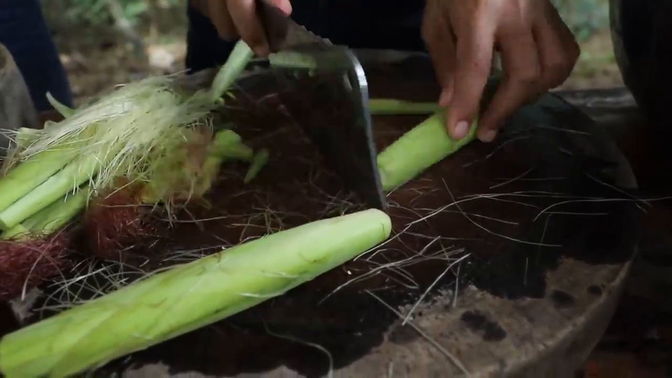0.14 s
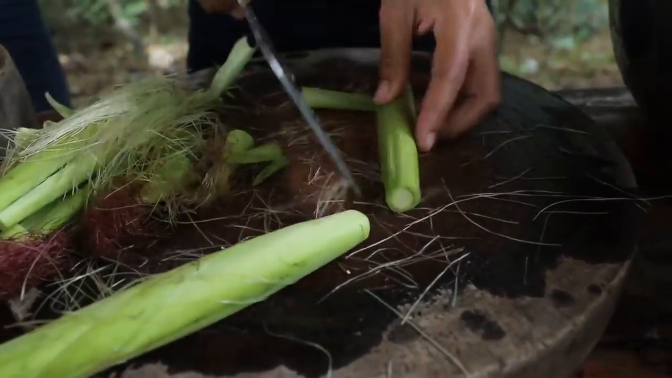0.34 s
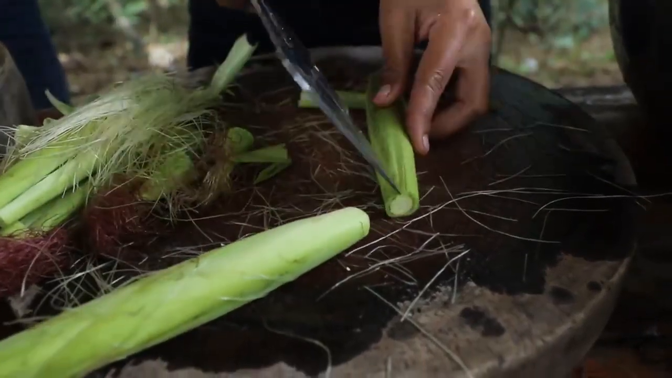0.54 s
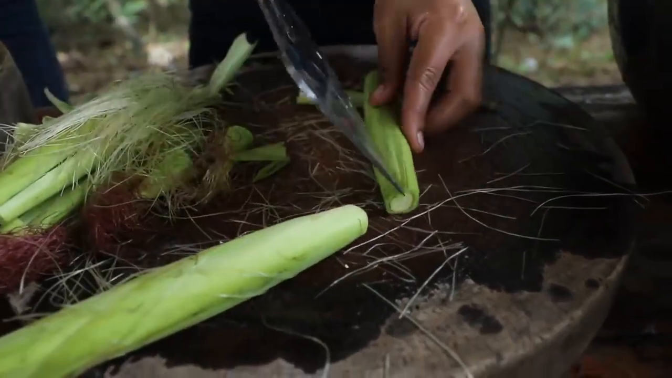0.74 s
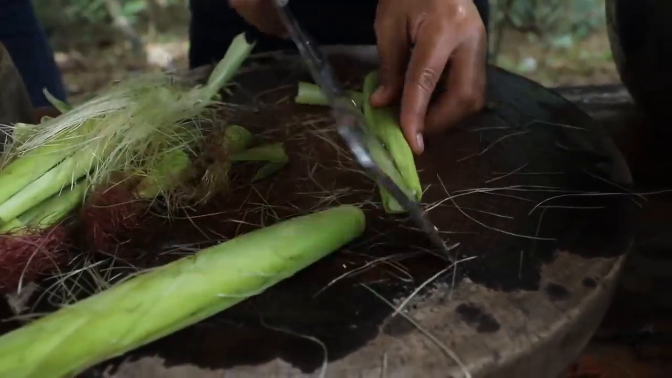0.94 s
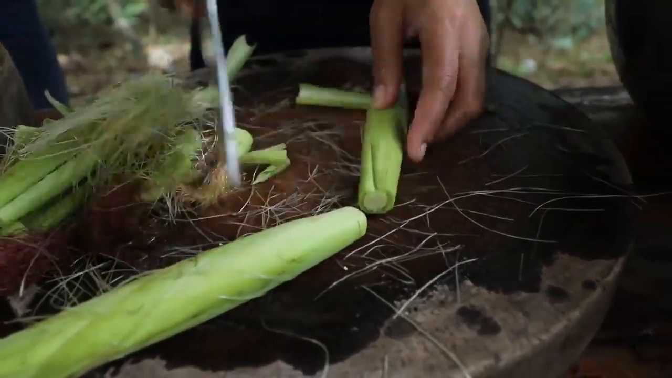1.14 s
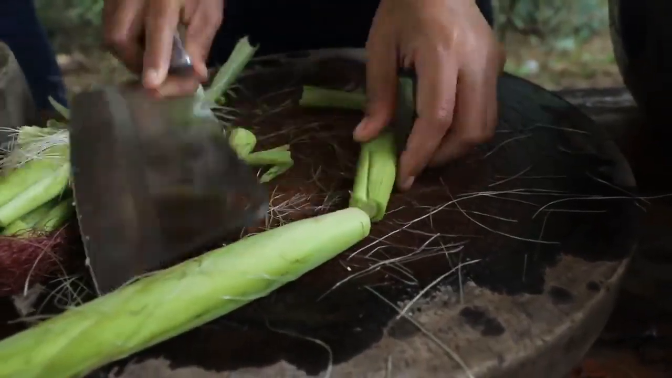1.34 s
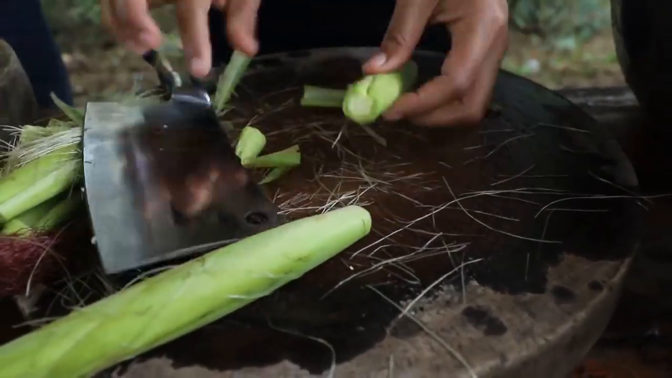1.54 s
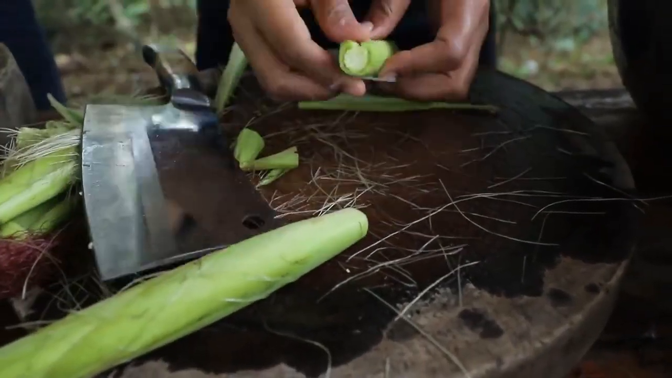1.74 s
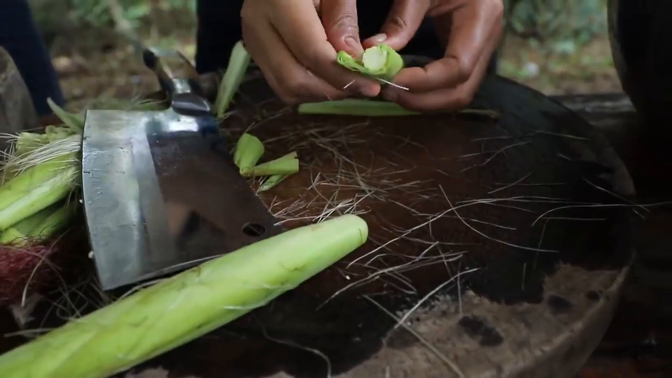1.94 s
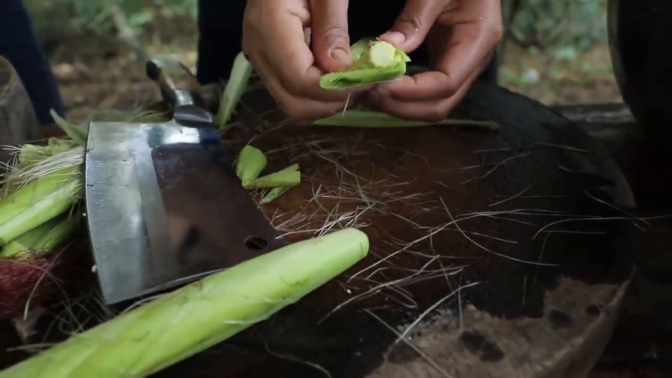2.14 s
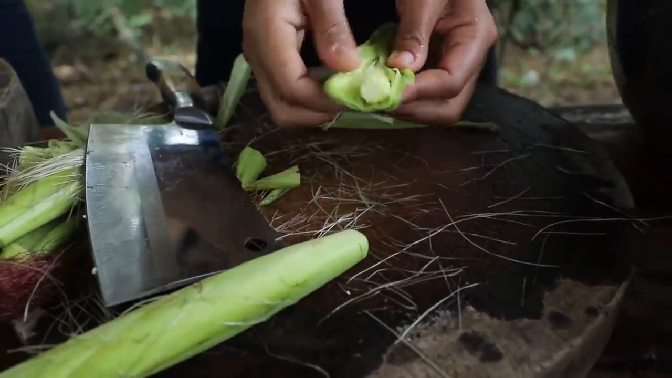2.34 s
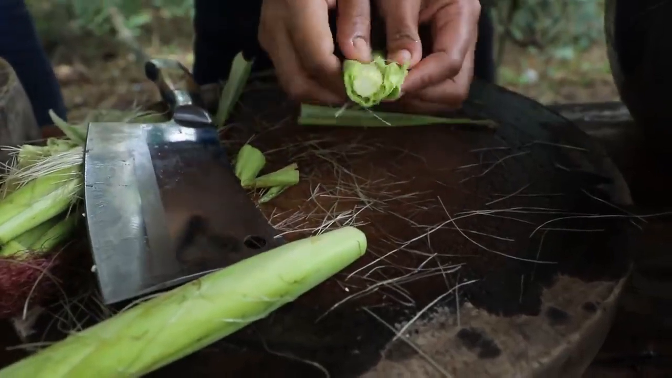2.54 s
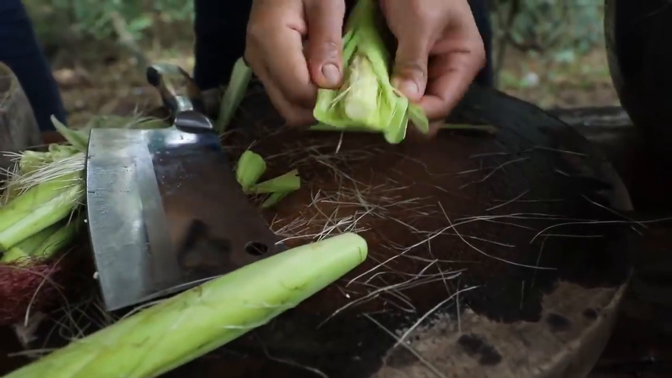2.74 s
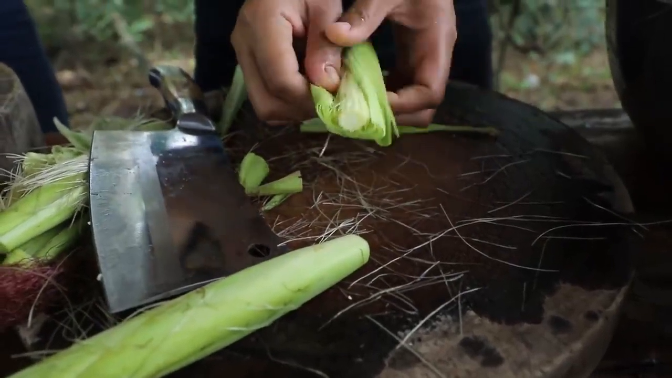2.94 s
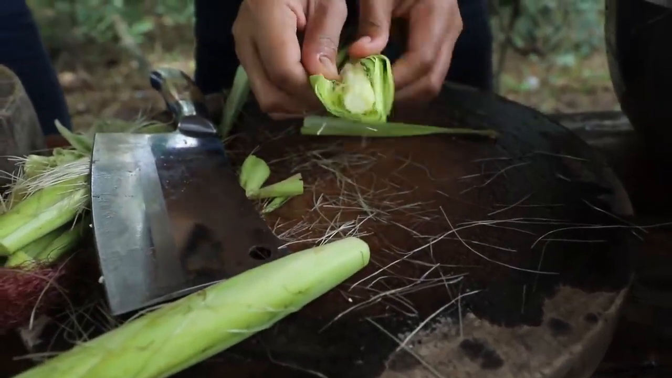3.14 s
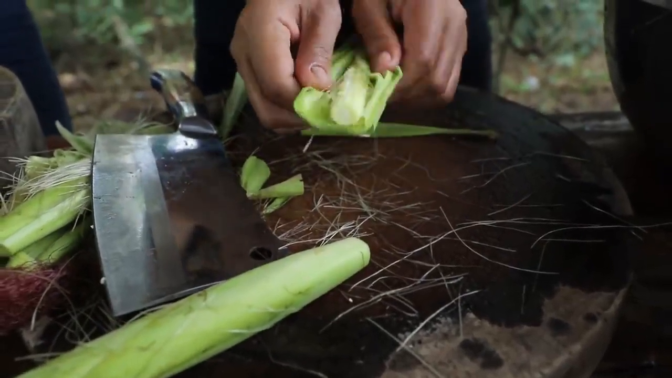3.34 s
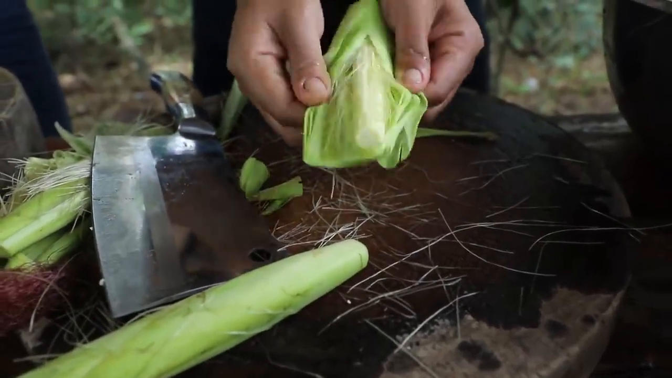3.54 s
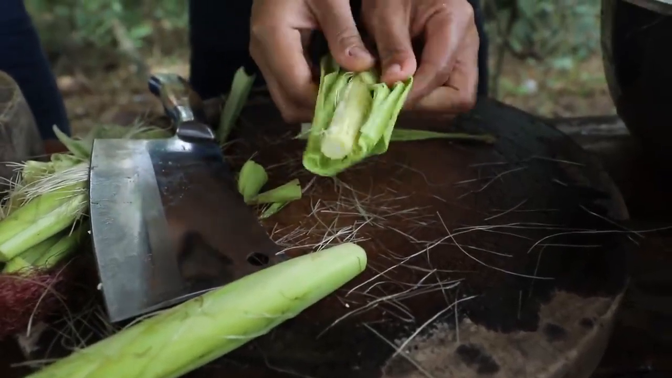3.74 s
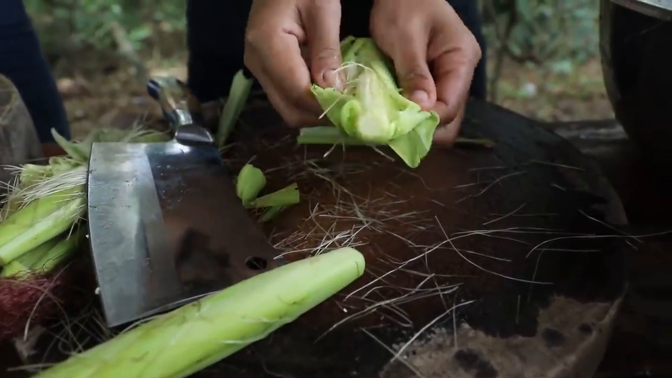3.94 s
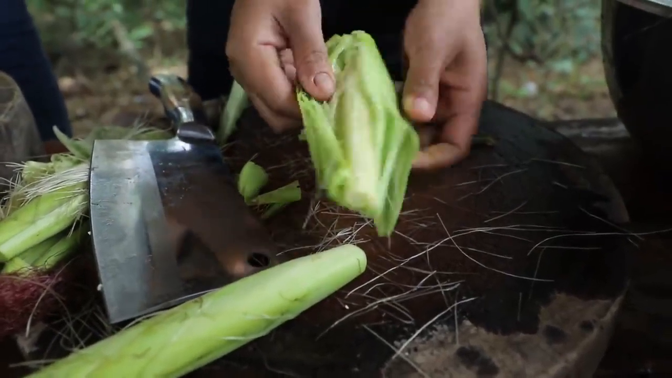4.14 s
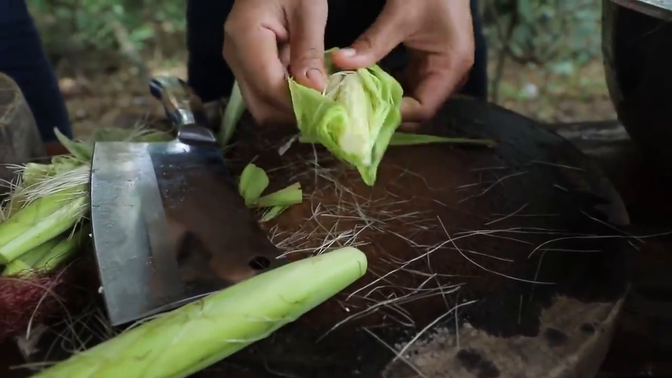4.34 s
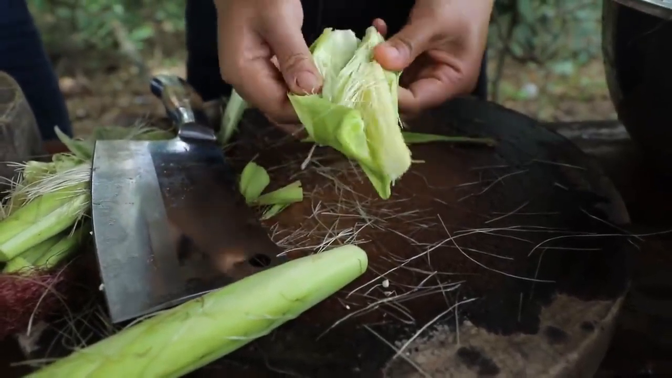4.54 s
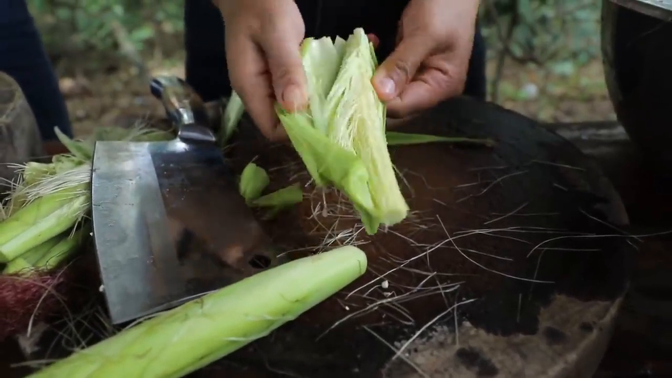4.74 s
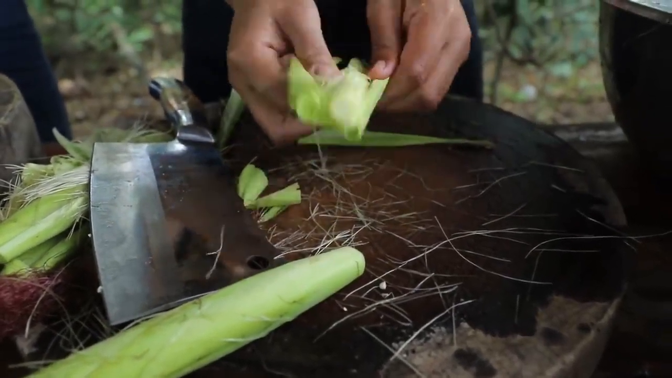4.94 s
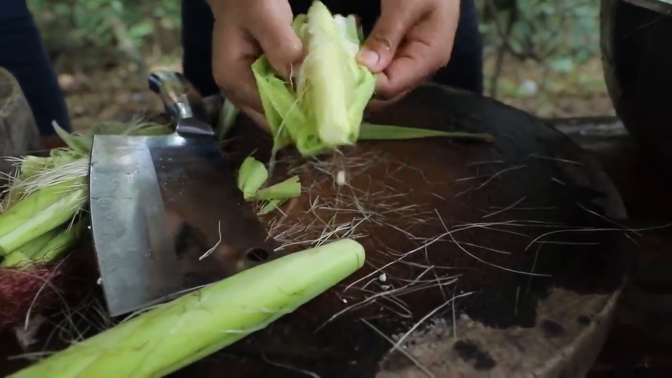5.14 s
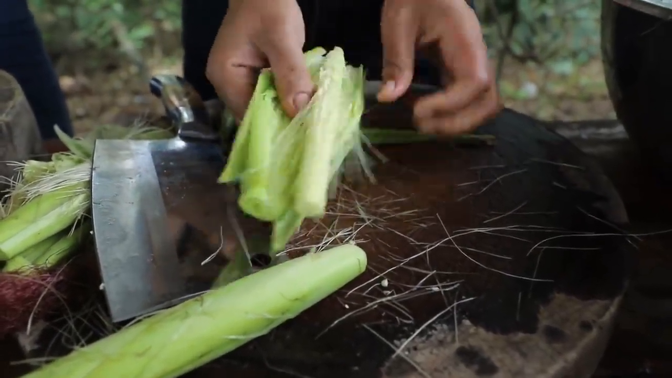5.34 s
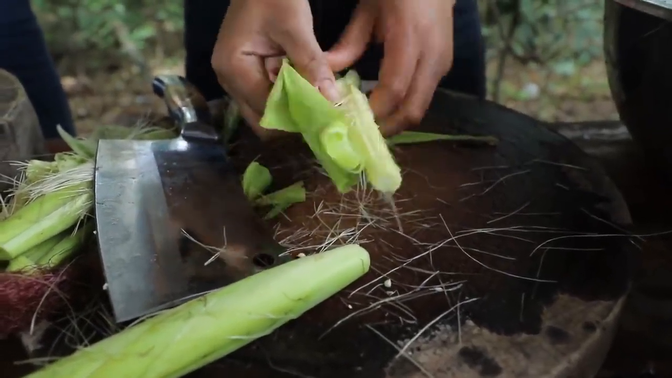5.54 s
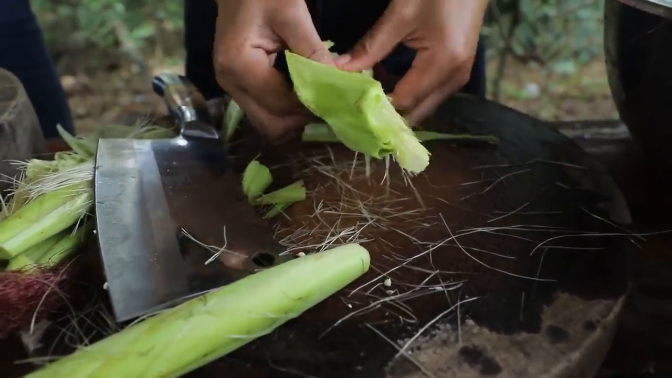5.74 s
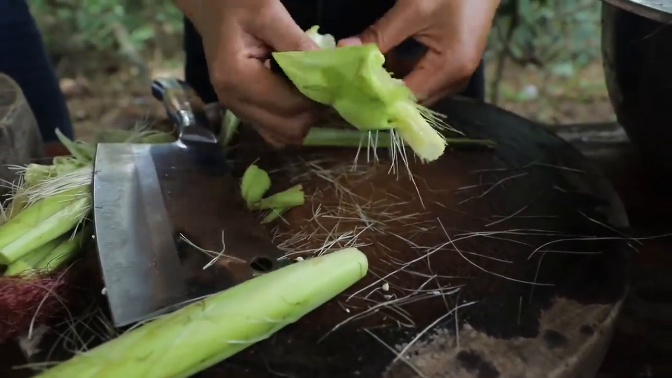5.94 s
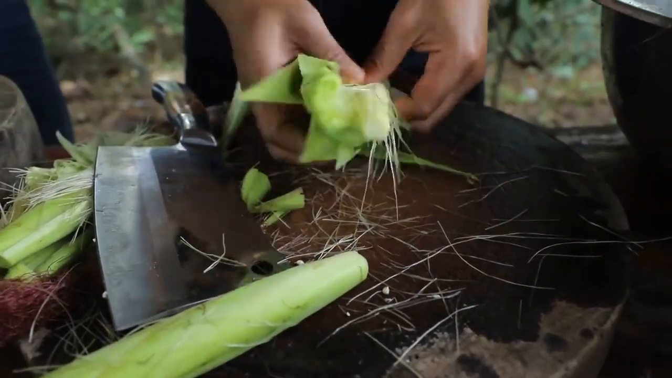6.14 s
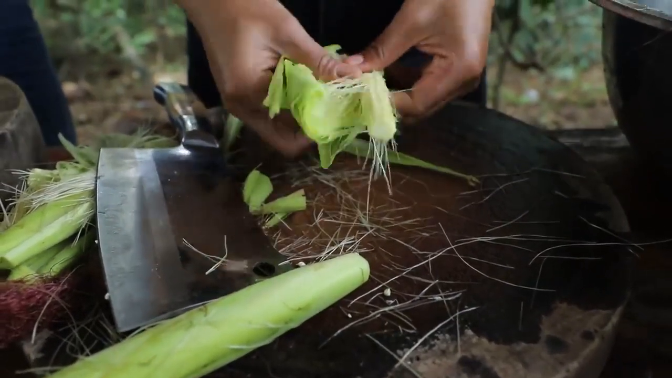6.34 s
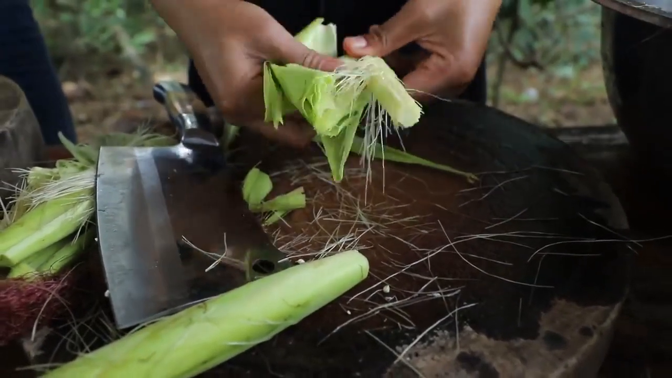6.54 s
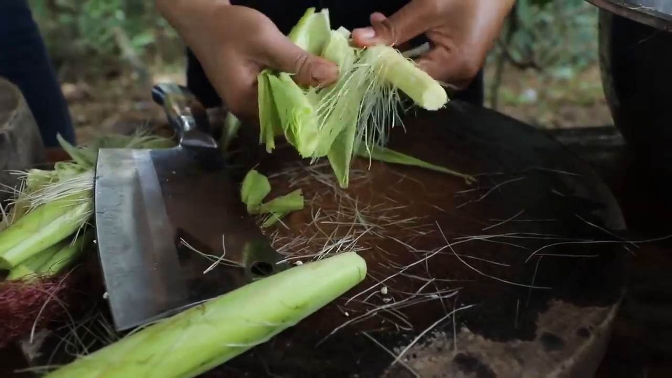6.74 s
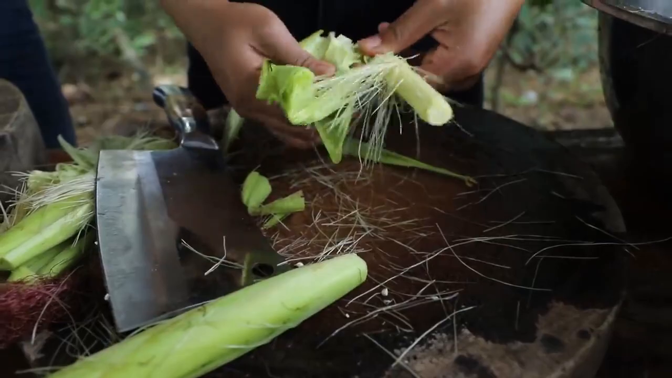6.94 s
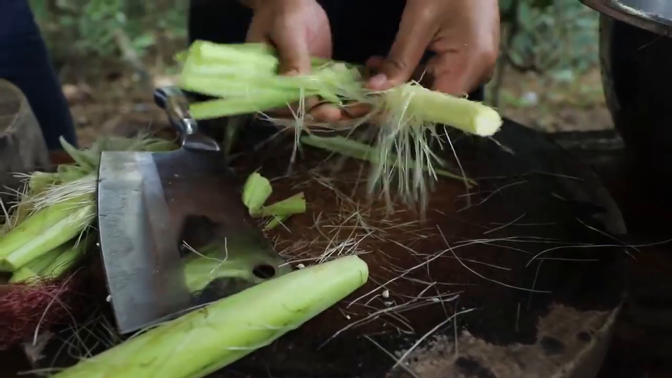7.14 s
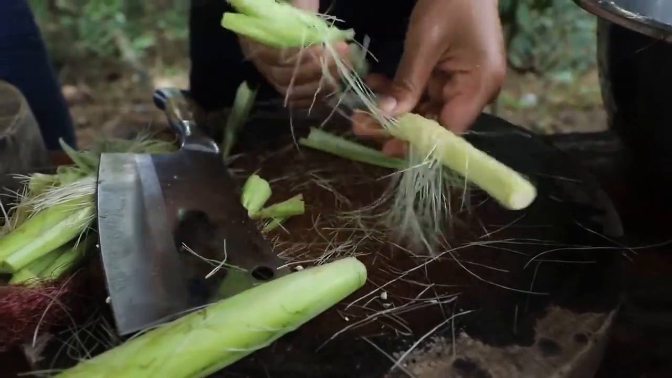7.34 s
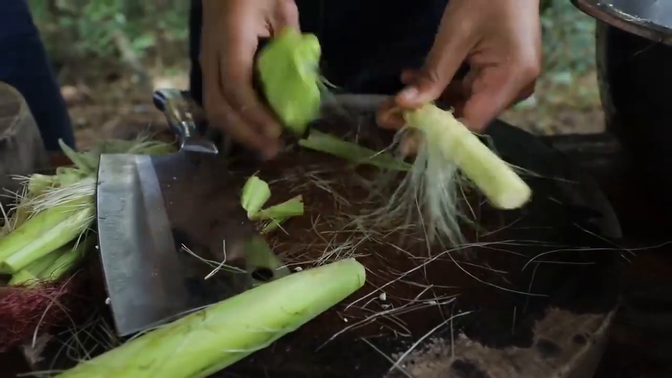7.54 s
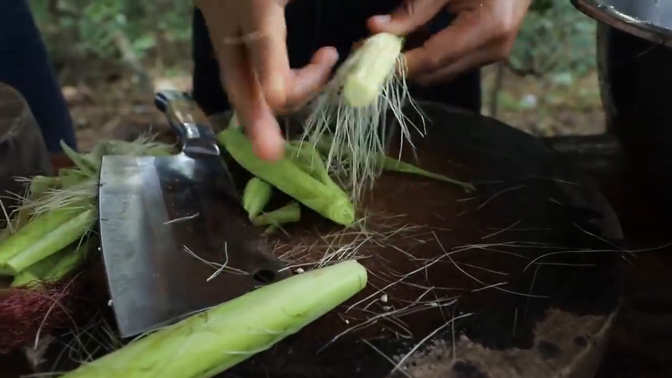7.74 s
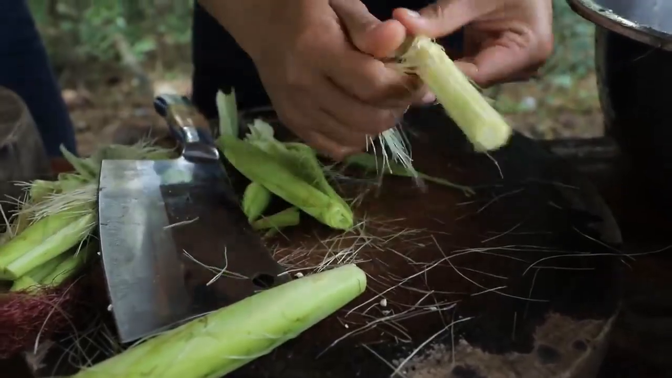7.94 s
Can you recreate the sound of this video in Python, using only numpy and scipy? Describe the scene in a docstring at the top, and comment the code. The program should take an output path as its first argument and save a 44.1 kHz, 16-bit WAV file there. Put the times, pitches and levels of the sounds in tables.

```python
"""A cleaver chops the end off a young corn ear on a wooden block outdoors, slits the husk and is laid down.
Hands tear the husk: cracks with short leaf tones and frayed noise, over grainy rustle. Block, hollow stand,
blade and a knocked metal dish are decaying modes plus noise clatter. A far bird is a pulsed near-sine trill;
open air is coloured noise. The input stage clips the loudest peaks."""
import sys
import numpy as np
from scipy import signal
from scipy.fft import rfft, irfft
from scipy.io import wavfile

SR = 44100
rng = np.random.default_rng(int(sys.argv[2]) if len(sys.argv) > 2 else 0)


def waveform_to_disk(signal):
    """Save audio, clipped to [-1, 1], as 16-bit WAV at the path in sys.argv[1]."""
    frames = np.transpose(np.atleast_2d(signal))
    scaled = np.clip(frames, -1, 1) * 32767
    samples = np.round(scaled).astype(np.int16)
    wavfile.write(sys.argv[1], SR, samples)


def convert_level_to_amplitude(level_db):
    """Map a level in decibels to its linear amplitude factor."""
    exponent = np.asarray(level_db, float) / 20
    return 10 ** exponent


N = 353239

# open-air noise, spectral shape: (frequency [Hz], relative level [dB])
AIR_SPECTRUM = [(18, -20), (30, 17.5), (59, 2.5), (98, 3), (273, -6.5), (404, -5.5), (512, -13.5),
                (844, -8.5), (1010, -11), (2610, -27), (4650, -19), (6050, -30), (14800, -41.5),
                (16000, -37)]
# bird phrases, falling trill then held note:
# (start [s], trill length [s], held length [s], end pitch [Hz], held-note rms [dB])
BIRD_PHRASES = [(-.22, .7, .19, 4220, -53), (1.85, .55, .09, 3570, -62), (3.85, .55, .105, 4745, -47),
                (4.75, .39, .08, 4180, -53.5), (5.36, .56, -.04, 3300, -53.5), (7.6, .37, .1, 3970, -62)]
# modes of the bodies: (frequency [Hz], relative level [dB], t60 [s])
BLOCK_MODES = [(82, -12.5, 0.22), (104, -9.5, 0.15), (167.2, -11, 0.17), (209, -9.5, .12),
               (315, -12.5, 0.096), (427.7, -14, 0.13), (448, -12.5, .06), (615, -18, 0.11),
               (774, -14.5, 0.033), (858, -21.5, .1), (1036, -4.5, 0.068), (1284, -24, 0.099),
               (1678, -16.5, 0.058)]
STAND_MODES = [(88.5, -6, .25), (289, -0.5, .15), (705, -1.5, 0.11), (710, -19, .85), (928, -8, .12),
               (935, -22.5, 0.6), (1064, -8.5, 0.18), (1083, -19, .9), (1292, -14.5, 0.15)]
BLADE_FLAT_MODES = [(630, -4, .15), (1130, -4, .06), (1400, -13, .16), (1497, -16, .17), (2288, -16, .11),
                    (4958, -12, .07), (6051, -16, .05), (1663, 0, .14), (2444, -6, .18), (2772, -4, .2)]
BLADE_HELD_MODES = [(2449, -4.5, 0.047), (5932, -9, .1), (6500, 1, 0.062), (7400, -8, .08),
                    (8301, -17, .13), (8950, -16, 0.19), (10260, -14, .06), (10900, -8, 0.099),
                    (13200, -20, .12)]
DISH_MODES = [(635, -12, .13), (985, -16, .3), (1179, -14, .07), (2372, -16, .1), (2740, -24, .2),
              (3698, -20, .1), (4059, -18, .1), (5879, -20, .08), (7278, -20, .06), (1518, -4, .17),
              (1760, -6, .05), (1846, -9, .14), (1960, -8, .05), (4573, -19, .4), (5170, -12, .3),
              (6554, -21, .3), (8834, -25, .2), (8975, -19, .17)]
# blows: (time [s], ring level [dB], hardness [dB/octave], clatter level [dB], clatter centre [Hz])
BLOCK_BLOWS = [(.167, -5.5, 3.5, -7.5, 6000), (0.1731, 15, 2, -2.5, 1000), (.187, 1.5, 1.5, -14, 400),
               (0.395, -35, -9.5, -56, 150), (.48, -32, -5.5, -71, 153), (.666, -41, -13.5, -57, 148),
               (.914, -35.5, -10.5, -46, 200), (1.055, -21, -6, -44, 150), (1.289, -39, -8.5, -68, 150.5),
               (1.533, -1, -2, -18, 876), (2.304, -25, -6.5, -51, 200), (2.325, -24.5, -6.5, -42, 200),
               (2.81, -8, -2, -18, 1200), (2.877, -11, 0.5, -44, 600), (2.934, -12.5, -2, -23.5, 603),
               (5.441, -35, -5.5, -62, 150), (6.874, -33, -5, -60, 149)]
STAND_BLOWS = [(.175, -11, -0.44, -20, 2500), (7.071, -31.5, -3, -36, 496), (7.088, -38, 0, -38, 900)]
FLAT_BLOWS = [(1.535, -9, 0, -18, 2500), (1.54, -34, 5, -18, 6000), (1.582, -46, 1, -36, 6000)]
HELD_BLOWS = [(.397, -39, 0.0079, -40, 5000), (.43, -53, 0, -52, 4960), (1.169, -47, 0.0052, -49, 6500),
              (1.228, -45.5, 0, -49, 5000)]
DISH_BLOWS = [(2.8085, -10, -3.5, -14.5, 2200), (2.812, -12, 7, -17, 11000),
              (2.815, -20, -4.5, -14.5, 1710), (2.836, -22, 5.5, -30.5, 6000),
              (2.8752, -18.5, -6.5, -12.5, 3870), (2.9088, -19, -5.5, -21.5, 1780),
              (2.9333, -5.5, -0.5, -11, 3500), (2.964, -23, -6.5, -23, 4430), (2.9844, -26, -2, -25, 2130),
              (3.013, -25.5, -7, -26, 1670), (3.032, -40, -5.5, -33, 1500), (3.048, -35, -10, -30, 1450),
              (3.062, -40, -6, -36, 1500)]
# clatter decay before each body's stretch: (frequency [Hz], t60 [s])
CLATTER_DECAY = [(150, 0.15), (500, 0.12), (1500, 0.078), (4000, 0.073), (12000, 0.035)]
# blade sliding on the husk:
# (peak time [s], relative level [dB], 20 dB rise [s], 20 dB fall [s], relative treble [dB])
SCRAPE_STROKES = [(.27, -46, .05, .1, -12), (.5, -39, .13, .06, -9), (.578, -51, .05, .045, -14),
                  (.672, -59, .04, .04, -3), (.94, -45, .04, .15, -4), (1.035, -36.5, .16, .062, -5.5),
                  (1.215, -41, .1, .035, -9), (1.41, -50, .1, .08, -4)]
# leaves rubbing and ripping:
# (peak time [s], relative level [dB], 20 dB rise [s], 20 dB fall [s], relative treble [dB])
RUSTLE_STROKES = [(1.735, -45, .04, .2, -8), (1.775, -38, .085, .045, -7), (2.04, -54, .035, .2, -11),
                  (2.138, -44, .18, .15, -11), (2.196, -40, .1, .08, -6), (2.309, -37.5, .12, .07, -8),
                  (2.509, -44.5, .04, .11, -8), (2.704, -41, .012, .09, -10), (2.8, -29, .04, .015, -9),
                  (3.1, -51, .04, .12, -10), (3.19, -56, .2, .06, -6), (3.26, -50, .04, .2, -12),
                  (3.532, -35.5, .2, .27, -9), (3.73, -40.5, .025, .25, -12),
                  (3.876, -39.5, .06, .016, -13), (3.958, -35, .012, .15, -16), (4.0, -32, .07, .023, -6),
                  (4.075, -36, .02, .11, -19), (4.129, -38, .06, .16, -8), (4.303, -39.5, .07, .033, -10),
                  (4.4, -58, .3, .3, -14), (4.494, -52, .13, .2, -7), (4.561, -36, .06, .13, -8.5),
                  (4.645, -46, .08, .2, -2.5), (4.736, -32, .06, .036, -17), (4.799, -37.5, .02, .063, -9),
                  (4.869, -41, .07, .12, 0.5), (4.956, -41, .15, .036, -8), (5.02, -48, .1, .15, -8),
                  (5.097, -38, .06, .06, -8.5), (5.2, -27, .025, .03, -12), (5.261, -33.5, .11, .018, -15),
                  (5.308, -24, .027, .028, -9), (5.42, -50, .04, .15, -10), (5.468, -49, .1, .07, -4),
                  (5.576, -44, .08, .16, -20), (5.658, -33.5, .022, .038, -17), (5.81, -50, .027, .4, -9),
                  (5.923, -42, .043, .045, -19), (6.051, -49, .1, .25, -13), (6.273, -40, .06, .19, -9),
                  (6.39, -53, .2, .2, -9), (6.518, -47, .12, .055, -8), (6.608, -43, .02, .1, 3),
                  (6.759, -19.5, .014, .038, -16), (6.929, -47.5, .13, .15, -12),
                  (7.026, -45, .06, .035, -15), (7.155, -53, .4, .5, -11), (7.287, -36, .027, .15, -8),
                  (7.337, -37.5, .06, .08, -7), (7.489, -36, .027, .043, -15), (7.58, -50, .04, .05, -10),
                  (7.685, -44, .028, .08, -8), (7.745, -46, .03, .1, -8), (7.774, -34, .036, .05, -12),
                  (7.904, -45, .032, .04, -18)]
# leaf colour, spectral shape: (frequency [Hz], relative density [dB per Hz])
LEAF_SPECTRUM = [(240, -27), (400, -1), (527, -2), (950, -16), (1440, -4), (1850, 0), (2790, -3),
                 (3720, -0.5), (8000, -5), (10400, -27), (17600, -120)]
# hands and blade shaking the block: (peak time [s], relative level [dB], 20 dB rise [s], 20 dB fall [s])
TREMBLE_STROKES = [(.3, -29, .02, .085), (.42, -40, .15, .5), (.6, -41, .5, .2), (.676, -38, .15, .15),
                   (.908, -35, .02, .4), (1.064, -23, .25, .09), (1.322, -37.5, .3, .05),
                   (1.55, -28, .1, .25), (1.75, -29.5, .07, .22), (2.176, -45, .1, .15),
                   (2.33, -11, .047, .05), (2.602, -39.5, .03, .18), (2.95, -15, .015, .165),
                   (3.3, -44, .14, .02)]
# husk fibres parting:
# (time [s], level [dB], leaf pitch [Hz], relative treble [dB], relative fraying tail [dB])
FIBRE_SNAPS = [(.3648, -27, 970, -2, -29), (.9159, -32, 8900, 8, -12), (.9689, -26.5, 3740, 5, -18),
               (1.0016, -27.5, 3880, 0, -14), (1.0364, -28.5, 4640, -2, -21), (1.2184, -20, 4600, -18, -18),
               (1.2273, -27, 880, -1.5, -6.5), (1.7287, -28, 3770, -10, -6),
               (1.8059, -26.5, 4450, -22, -34), (2.1377, -26, 3640, 0, -17),
               (2.1959, -14.5, 4600, -11, -40), (2.2043, -20.5, 4570, -12, -23),
               (2.2287, -28, 4570, -12, -23), (2.363, -28, 4610, -17, -18), (2.7008, -31, 2190, -4, -20),
               (2.7356, -35, 2480, -6, -7.5), (2.7605, -28, 4050, -10, -16), (2.7683, -27, 4310, -1, -11),
               (2.7788, -12.5, 4560, -3, -28), (2.7865, -19, 4480, -30, -27),
               (2.7989, -23.5, 2730, -4, -15), (3.2603, -29, 4350, -8, -20), (3.3971, -27, 1090, -30, -8.5),
               (3.4383, -20, 1080, -30, -5.5), (3.4624, -26, 4130, -18, -16), (3.4778, -19, 4400, -26, -25),
               (3.5074, -18.5, 2090, -11, -25), (3.5182, -29, 3880, -3, -5), (3.5383, -17, 4670, -7, -20),
               (3.5522, -24.5, 1130, -1, -12), (3.593, -21, 4480, -8, -10.5), (3.6123, -21, 4270, -15, -16),
               (3.6195, -21, 4390, -16, -35), (3.6727, -23.5, 6050, 0, -13),
               (3.7248, -13.5, 5360, -10, -32), (3.7361, -23, 5600, -9, -14),
               (3.7414, -20.5, 4360, -14, -19), (3.764, -23, 4060, -15, -22), (3.8791, -32, 4220, -6, -5.5),
               (3.9548, -14, 2180, -23, -16), (3.962, -15, 2580, -30, -20), (3.9904, -7, 4020, -30, -29),
               (3.9973, -12.5, 2350, -30, -25), (4.0041, -7.5, 3060, -10.5, -10.5),
               (4.022, -18.5, 4630, -24, -20), (4.0299, -25, 4870, -16, -16), (4.062, -21, 4050, -23, -31),
               (4.0699, -15.5, 1970, -14, -14), (4.082, -6, 4350, -18, -29), (4.0986, -15, 4430, -9, -33),
               (4.118, -24, 2920, -12, -20), (4.1245, -2.5, 3550, -35, -22.5),
               (4.2062, -12, 3030, -26, -21), (4.3006, -28, 4640, -21, -19),
               (4.5425, -15.5, 3860, -15, -28), (4.5561, -13, 2900, -17, -18),
               (4.5762, -27.5, 3170, -7, -5), (4.5881, -22, 2710, -12, -20), (4.6333, -17.5, 3900, -2, -21),
               (4.6437, -12, 3670, -6, -12), (4.6755, -16, 4930, -4.5, -18), (4.695, -15, 4910, -15, -23),
               (4.7077, -7, 6450, -18, -35), (4.7254, -19, 1870, -13, -7.5), (4.7341, -13.5, 3600, -22, -8),
               (4.7415, -16, 5200, -14, -17), (4.7652, -33, 5680, -10, 0), (4.7896, -15.5, 5330, -10, -16),
               (4.7956, -13.5, 5300, -16, -31), (4.8047, -20.5, 5040, -10, -6.5),
               (4.825, -27, 5060, -1.5, -26), (4.8412, -24, 4690, -15, -18), (4.8624, -12, 5400, -14, -8),
               (4.8754, -14.5, 5300, -25, -31), (4.8804, -21, 5430, -10, -33),
               (4.8902, -20.5, 5340, -3, -26), (4.953, -19.5, 8350, -9, -16),
               (5.0951, -12.5, 2700, -18, -17.5), (5.1814, -4, 4130, -28, -20),
               (5.1978, -11, 4180, -13, -6.5), (5.2056, -8.5, 4100, -11, -27), (5.217, -21, 4660, -8, -19),
               (5.2307, -28, 3950, 4, -12), (5.2419, -28, 3800, 11, -24), (5.2587, -10, 4530, -9, -16),
               (5.2672, -13, 4250, -17, -15), (5.2828, -23.5, 4000, 4, -8), (5.305, 2.5, 5620, -15, -19),
               (5.3335, -18, 4150, -2, -32), (5.3439, -22, 4800, -10, -12), (5.5726, -24.5, 1070, -25, -11),
               (5.6505, -30, 880, -9, -8), (5.6577, -15.5, 4980, -30, -17.5), (5.7304, -26, 5000, -11, -14),
               (5.8046, -31, 5210, 0, -18), (5.8227, -22, 4800, -2, -31), (5.8432, -26, 4350, 1, -28),
               (5.8659, -31.5, 8760, -1, -22), (5.9234, -24, 2260, -20, -16),
               (5.9382, -26.5, 4460, -13, -17), (6.0449, -26.5, 4670, -30, -23),
               (6.0512, -26, 4750, -9, -32), (6.2686, -20, 4400, -14, -14), (6.3498, -31, 8340, -2.5, -10),
               (6.5166, -16.5, 2850, 0, -34), (6.5588, -16.5, 5150, -18, -33),
               (6.6, -6, 4770, -11.5, -19.5), (6.6054, -19, 6350, 2, -28), (6.6159, -10.5, 4430, 2, -24),
               (6.6287, -6.5, 5100, -6, -36), (6.6477, -11.5, 2700, -9.5, -13.5),
               (6.6607, -24, 5200, -19, -28), (6.682, -26, 6200, 2, -27), (6.6972, -22, 6090, -30, -24),
               (6.7066, -22.5, 4300, 2, -31), (6.7309, -20, 5300, -4, -28), (6.7401, -25, 5300, -8, -17),
               (6.7535, -0.5, 3150, -9.5, -14), (6.7597, -17.5, 3000, -16, -9),
               (6.7826, -29, 4340, 11.5, -17), (6.8123, -24.5, 6460, -4, -29), (6.818, -27, 7730, -15, -31),
               (7.0207, -33.5, 3740, 5, -9.5), (7.0619, -28, 7190, -5, -32),
               (7.1015, -15.5, 6290, -12, -28), (7.1129, -24.5, 6520, -10, -31),
               (7.1688, -28, 5660, -8, -25), (7.1948, -11.5, 5740, -9, -36), (7.2338, -4.5, 4200, -8, -40),
               (7.2791, -8, 4300, -9.5, -39), (7.2876, -30.5, 4230, 12, -17), (7.3102, -23, 4630, 9, -22),
               (7.3308, -21.5, 6340, -7, -11), (7.3427, -7.5, 4480, -5, -31),
               (7.3525, -20.5, 6850, -2, -35), (7.4282, -24.5, 4100, -5, -37),
               (7.4885, -12.5, 7250, -26, -27), (7.4928, -20, 3200, 4, -29),
               (7.5541, -22.5, 4610, -21, -31), (7.5715, -33, 4820, -13, -20),
               (7.6783, -28.5, 4800, -13, -22), (7.7478, -26, 3900, -30, -14), (7.7718, -23, 4200, -8, -9),
               (7.9071, -24.5, 4890, -23, -24.5)]


def rms_one(x):
    """Scale to unit rms."""
    return x / np.sqrt(np.mean(x ** 2) + 1e-20)


def at_hz(points, hz):
    """Interpolate a spectrum linearly on log frequency."""
    points_hz, values = np.transpose(points)
    return np.interp(np.log(hz), np.log(points_hz), values)


def coloured(x, spectrum):
    """Weight x by a spectrum in dB."""
    hz = np.maximum(np.fft.rfftfreq(N, 1 / SR), 1)
    return irfft(rfft(x) * convert_level_to_amplitude(at_hz(spectrum, hz)), N)


def band(x, low_hz, high_hz):
    """Band-pass along the last axis."""
    return signal.sosfilt(signal.butter(2, [low_hz, high_hz], "band", fs=SR, output="sos"), x)


def drift(rate_hz):
    """Unit-rms noise through two equal one-pole low-passes, computed every 40 samples."""
    r = np.exp(-2 * np.pi * rate_hz * 40 / SR)
    slow = signal.lfilter([1], [1, -2 * r, r * r], rng.standard_normal(N // 40 + 2002))[2000:]
    return np.interp(np.arange(N) / 40, np.arange(len(slow)), rms_one(slow))


def ring(x, hz, t60_s):
    """Two-pole resonator: a unit click gives a decaying sine of unit initial envelope."""
    r = convert_level_to_amplitude(-60 / (t60_s * SR))
    w = 2 * np.pi * hz / SR
    return signal.lfilter([0, np.sin(w)], [1, -2 * r * np.cos(w), r * r], x + 1e-18)


def clicks(times_s, levels_db):
    """Single-sample impulses."""
    out = np.zeros(N)
    np.add.at(out, np.round(times_s * SR).astype(int), convert_level_to_amplitude(levels_db))
    return out


def strokes(rows, roundness):
    """Gain of a run of swells, the strongest ruling; a fifth column adds a treble gain."""
    treble_swing = 1.2   # treble dB change per body dB: light contact is duller
    t = np.arange(0, N + 40, 40) / SR
    level_db = -200
    for peak_s, db, rise_s, fall_s, *treble_db in rows:
        distance = np.where(t < peak_s, (peak_s - t) / rise_s, (t - peak_s) / fall_s)
        loss_db = 20 * distance ** roundness
        swells = [db - loss_db]
        swells += [db + share - treble_swing * loss_db for share in treble_db]
        level_db = np.maximum(level_db, swells)
    return [convert_level_to_amplitude(np.interp(np.arange(N) / SR, t, row)) for row in level_db]


def air():
    """Leaves, insects and distant wash: coloured noise with slow level drift."""
    level_db = -44.5 + 1.4 * drift(1.1)
    return convert_level_to_amplitude(level_db) * rms_one(coloured(rng.standard_normal(N), AIR_SPECTRUM))


def bird(waver):
    """Near-sine phrases chopped into pulses that slow down and melt into a steady note."""
    pitch_drop, swell_db = .15, 11   # trill starts this share higher and this much quieter
    entry_s, fade_s = .12, .05
    out, t = np.zeros(N), np.arange(N) / SR
    for start_s, trill_s, held_s, end_hz, db in BIRD_PHRASES:
        left = np.clip(1 - (t - start_s) / trill_s, 0, 1)   # share of the trill still to come
        depth = np.clip(9.0 * left, 0, 1)
        pulses_per_s = np.interp(left, [0, 1], [50, 85])
        pulse = np.cos(np.pi * np.cumsum(pulses_per_s) / SR) ** 4
        fade_out = np.clip((start_s + trill_s + held_s - t) / fade_s, 0, 1)
        fade_in = np.clip((t - start_s) / entry_s, 0, 1)
        envelope = (1 + depth * (2 * pulse - 1)) * fade_out * fade_in
        hz = end_hz * (1 + pitch_drop * left ** 1.4) * (1 + waver * depth * drift(60))
        tone = np.sin(2 * np.pi * np.cumsum(hz) / SR)
        level_db = db - swell_db * left + 2.5 * depth * drift(9)
        out += np.sqrt(2) * convert_level_to_amplitude(level_db) * envelope * tone
    return out


def struck(modes, blows, middle_hz, choke_db, rise_cycles):
    """Each blow rings all modes; hardness tilts them, each later contact within 1 s scales the ring by choke_db."""
    hz, level_db, t60_s = np.transpose(modes)[:, :, None]
    t = np.arange(int(SR * min(t60_s.max(), .6))) / SR
    out = np.zeros(N + SR)
    onset = 1 - np.exp(-t * hz / rise_cycles)
    rings = -np.sin(2 * np.pi * hz * t) * convert_level_to_amplitude(level_db - 60 * t / t60_s) * onset
    for s, db, hardness, *_ in blows:
        # each contact takes hold over 3 ms
        later = sum(np.clip((s + t - b[0]) / .003, 0, 1) for b in blows if s < b[0] < s + 1)
        mode_gain = convert_level_to_amplitude(db + hardness * np.log2(hz[:, 0] / middle_hz))
        at = round(s * SR)
        out[at:at + len(t)] += mode_gain @ rings * convert_level_to_amplitude(choke_db * later)
    return out[:N]


def block():
    """Wooden block: short modes, damped by later contacts."""
    return struck(BLOCK_MODES, BLOCK_BLOWS, middle_hz=302, choke_db=-3, rise_cycles=.4)


def hollow_stand():
    """Hollow stand: longer modes, strengthened by later contacts."""
    return struck(STAND_MODES, STAND_BLOWS, middle_hz=700, choke_db=1.5, rise_cycles=.6)


def clatter(bodies):
    """Countless small modes as noise bands round each blow's centre, dying fast, then slowly."""
    out = 0
    edges_hz = 120 * 2 ** np.arange(0, 7.2, .7)
    for low_hz, high_hz in zip(edges_hz, edges_hz[1:]):
        hz, dying = np.sqrt(low_hz * high_hz), 0
        for blows, narrow_db, stretch, wash_db, wash_stretch in bodies:
            s, _, _, db, centre_hz = np.transpose(blows)
            kick = clicks(s, db - narrow_db * np.log2(hz / centre_hz) ** 2) + 1e-18
            t60_s = np.array([stretch, wash_stretch]) * at_hz(CLATTER_DECAY, hz)
            fast, slow = convert_level_to_amplitude(-60 / (t60_s * SR))
            wash = convert_level_to_amplitude(wash_db)
            # two decays in parallel, as one filter
            poles = np.convolve([1, -fast], [1, -slow])
            dying = dying + signal.lfilter([1 + wash, -slow - wash * fast], poles, kick)
        noise = band(dying * rng.standard_normal(N), low_hz, high_hz)
        out = out + noise * np.sqrt(SR / 2 / (high_hz - low_hz))
    return out


def rustle(rows, roundness, per_s, spread_db, clump_db, smooth, level_db):
    """Dense clumped micro-cracks over smooth rubbing, through the colour of the leaves."""
    gain, treble_gain = convert_level_to_amplitude(level_db) * np.array(strokes(rows, roundness))
    sizes = convert_level_to_amplitude(spread_db * np.minimum(rng.exponential(1, N), 4)) * rng.choice([-1, 1], N)
    grains = rms_one(sizes * (rng.random(N) < per_s / SR))
    rub = (grains + smooth * rng.standard_normal(N)) * convert_level_to_amplitude(clump_db * drift(45))
    body = gain * rms_one(coloured(rub, LEAF_SPECTRUM))
    treble = rms_one(band(band(rub, 6500, 14400), 6000, 17000))
    return body + treble_gain * treble


def tremble():
    """Steady noise pushes excite the block's four lowest modes, at 0.6 of their t60."""
    push = rng.standard_normal(N)
    shaking = sum(convert_level_to_amplitude(db) * ring(push, hz, .6 * t60_s) for hz, db, t60_s in BLOCK_MODES[:4])
    return strokes(TREMBLE_STROKES, roundness=1)[0] * convert_level_to_amplitude(-11.0) * rms_one(shaking)


def snaps(cycles, crack_db, tail_s, lead_s):
    """A fibre strains, then parts: broad crack, a few cycles of the freed leaf, grainy fraying tail."""
    s, db, hz, treble_db, tail_db = np.transpose(FIBRE_SNAPS)[:, :, None]
    t = np.arange(-200, 900) / SR
    noise = rng.standard_normal((len(FIBRE_SNAPS), 4, len(t)))

    def dying(t60_s):
        """Exponential decay from the break."""
        return convert_level_to_amplitude(-60 * np.maximum(t, 0) / t60_s) * (t >= 0)

    # fraying swells in before the break
    tail = convert_level_to_amplitude(-60 * np.where(t < 0, -t / lead_s, t / tail_s)) * np.minimum(noise[:, 3] ** 2, 3.0)
    # low, floppy leaves ring fewer cycles
    leaf = np.sin(2 * np.pi * hz * t) * dying(cycles / np.sqrt(4000 * hz))
    crack = convert_level_to_amplitude(crack_db) * band(noise[:, 0] * dying(0.0085), 920, 5700)
    hiss = noise[:, 1] * (dying(0.0033) + convert_level_to_amplitude(tail_db + 1.0) * tail)
    treble = convert_level_to_amplitude(treble_db - 0.5) * band(hiss, 5300, 13400)
    # the tail keeps the leaf's pitch
    hum = band(noise[:, 2] * tail, 58.4, 590) * np.sin(2 * np.pi * hz * t)
    fray = convert_level_to_amplitude(tail_db) * (convert_level_to_amplitude(6.5) * band(noise[:, 2] * tail, 1320, 5200) + convert_level_to_amplitude(19.5) * hum)
    out = np.zeros(N + len(t))
    np.add.at(out, np.round((s + t) * SR).astype(int), convert_level_to_amplitude(db) * (leaf + crack + treble + fray))
    return band(out[:N], 520, 17000)   # thin leaves radiate no bass


def blade():
    """Cleaver: one set of modes when held, another when its flat is struck."""
    held = struck(BLADE_HELD_MODES, HELD_BLOWS, middle_hz=6000, choke_db=-1.5, rise_cycles=.8)
    flat = struck(BLADE_FLAT_MODES, FLAT_BLOWS, middle_hz=2000, choke_db=-0.5, rise_cycles=.8)
    return held + flat


def dish():
    """Metal dish: modes choked by each further rattle contact."""
    return struck(DISH_MODES, DISH_BLOWS, middle_hz=1960, choke_db=-3.45, rise_cycles=1.0)


def scene():
    """All sources at one microphone."""
    wood = block() + tremble() + hollow_stand()
    metal = blade() + dish()
    # (blows, narrowing [dB per octave squared], decay stretch, wash [dB], wash decay stretch)
    noise = clatter([(BLOCK_BLOWS + STAND_BLOWS, 2.5, .8, -26, 3.5),
                     (FLAT_BLOWS, 3.0, .4, -16, 2.2),
                     (HELD_BLOWS + DISH_BLOWS, 7.0, .3, -22, 2.2)])
    husk = snaps(cycles=16.0, crack_db=-10.5, tail_s=0.014, lead_s=0.004)
    husk += rustle(SCRAPE_STROKES, roundness=2, per_s=5000, spread_db=4.0, clump_db=2.0,
                   smooth=0.77, level_db=-0.05)
    husk += rustle(RUSTLE_STROKES, roundness=1, per_s=2400, spread_db=4.0, clump_db=3.2,
                   smooth=0.85, level_db=-1.0)
    return (wood + metal + noise + husk + bird(waver=0.006) + air())[None]


def band_limit(x):
    """A steep low-pass at the top of the band."""
    return signal.sosfilt(signal.butter(12, 16370, fs=SR, output="sos"), x)


def record(dry):
    """The microphone drops the deepest bass; the input stage clips hard."""
    thin = signal.sosfilt(signal.butter(3, 52, "high", fs=SR, output="sos"), dry)
    mix = np.clip(thin, -.98, .98)
    return band_limit(mix)


dry = scene()
out = record(dry)
waveform_to_disk(out)
```